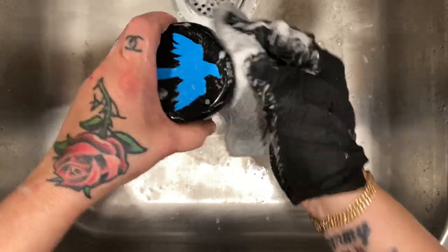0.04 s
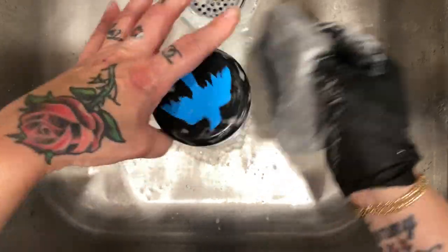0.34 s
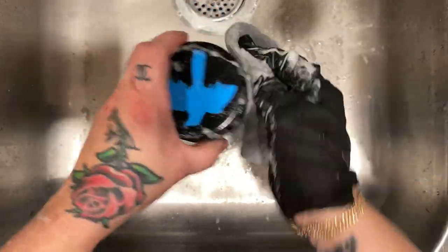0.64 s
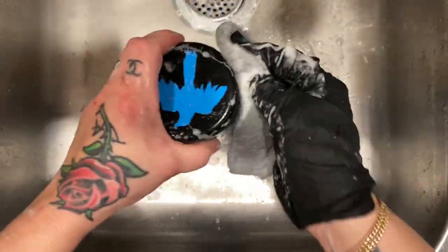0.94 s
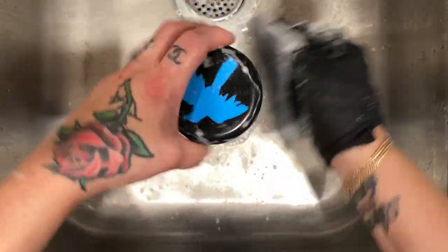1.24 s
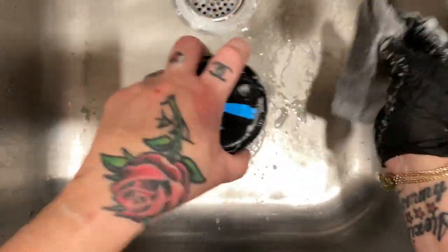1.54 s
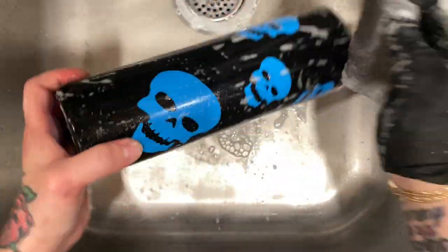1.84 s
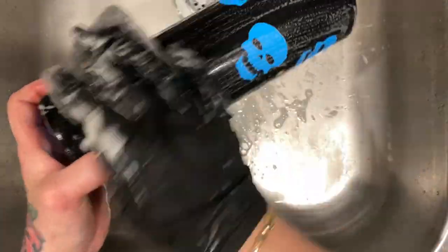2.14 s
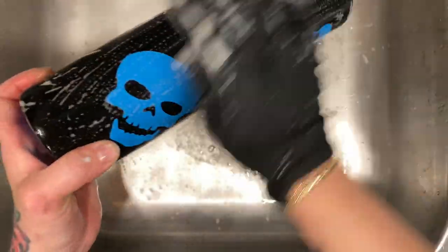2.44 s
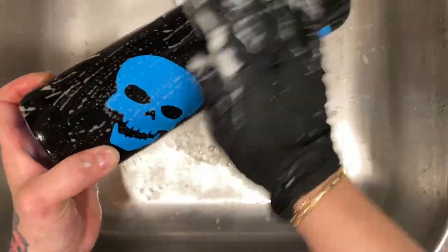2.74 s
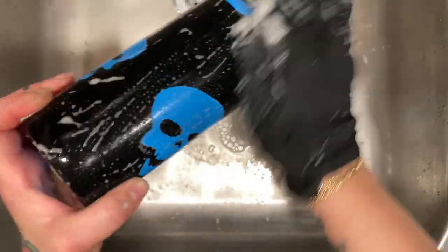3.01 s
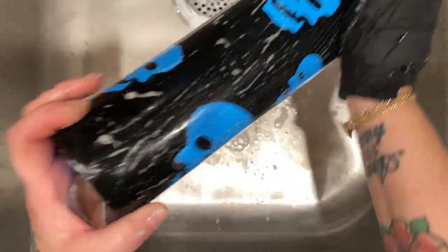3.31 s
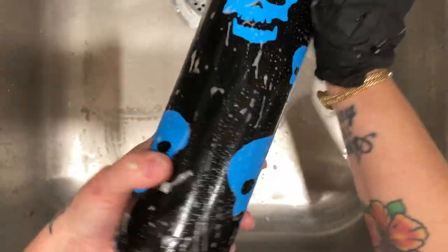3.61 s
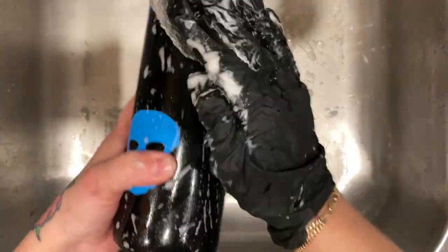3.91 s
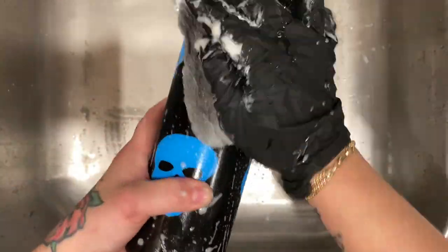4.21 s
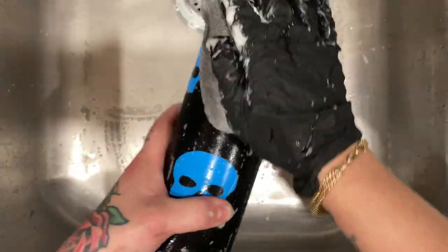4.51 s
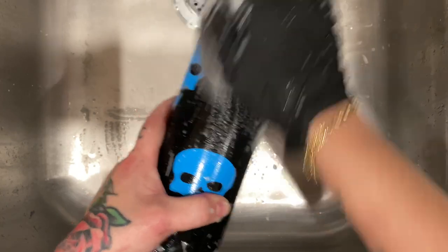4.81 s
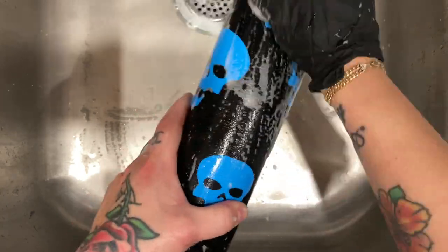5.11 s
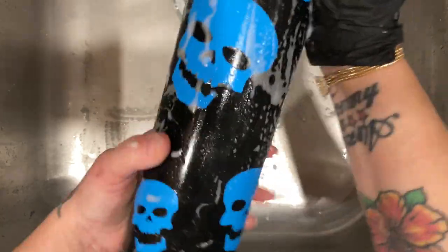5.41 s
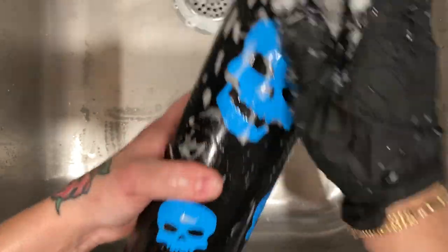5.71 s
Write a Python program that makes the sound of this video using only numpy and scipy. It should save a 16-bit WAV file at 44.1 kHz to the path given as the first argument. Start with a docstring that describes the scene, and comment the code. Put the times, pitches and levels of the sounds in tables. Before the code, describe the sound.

A wet sanding sponge scrubs a steel cup in a metal sink, heard close up. At first, quick shoves knock the cup against the basin, which booms while the cup rings, with wet slaps and tiny squeaks. After a brief lull, the sponge rubs to and fro in soft hissing, rasping strokes, with fizzing lather and a squelch of paste. A low motor hum fills the room throughout.

```python
"""Scrubbing a steel cup in the sink

A wet sanding sponge scrubs a coated steel cup, close up, over the low hum of a motor in the room.
At first the cup stands upside down: each shove knocks it on the steel basin, which booms as the cup rings.
Then it is lifted and its wall is rubbed to and fro in soft hissing strokes: grains rasp, lather fizzes,
paste squelches and the air in the cup rings faintly."""
import sys
import numpy as np
from scipy import signal
from scipy.fft import rfft, irfft, next_fast_len
from scipy.io import wavfile

SR = 44100
rng = np.random.default_rng(int(sys.argv[2]) if len(sys.argv) > 2 else 0)


def unload_audio(sound):
    """Save the sound as a 16-bit wav file, at the path given as the first command line argument."""
    columns = np.transpose(np.atleast_2d(sound))
    # keep every value between -1 and 1, then stretch to whole-number steps
    steps = np.round(np.clip(columns, -1, 1) * 32767)
    wavfile.write(sys.argv[1], SR, steps.astype(np.int16))


N = 253565
T = np.arange(N) / SR
LIFT_S, RESUME_S = 1.6, 1.98  # the cup leaves the basin; the sponge meets it again


def amp(db):
    """Decibels to linear gain."""
    return 10 ** (np.asarray(db) / 20)


def unit(x):
    """Scales x to an rms of 1."""
    return x / np.sqrt(np.mean(x ** 2) + 1e-20)


def add(mix, start_s, sound):
    """Drops a sound into the mix at start_s."""
    part = mix[max(0, round(start_s * SR)):][:len(sound)]
    part += sound[:len(part)]


def eq(x, curve):
    """Shapes x with a curve of (frequency [Hz], gain [dB]) points."""
    size = next_fast_len(x.shape[-1])
    hz, db = np.transpose(curve)
    gain = amp(np.interp(np.log(np.fft.rfftfreq(size, 1 / SR) + 1), np.log(hz), db))
    return irfft(rfft(x, size) * gain, size)[..., :x.shape[-1]]


def wander(hz):
    """Random modulation of rms about 1, with changes up to hz."""
    steps = np.arange(0, T[-1] + 1, 1 / (2 * hz))
    return np.sqrt(3 / 2) * np.interp(T + rng.random() / 2, steps, rng.standard_normal(len(steps)))


def burst(low_hz, high_hz, rise, decay, grain_db=0):
    """A band of grainy noise, like a crowd of close modes that swell and die together."""
    t = T[:round(min(0.5, 10 * decay + 2 * rise) * SR)]
    grains = rng.standard_normal(len(t)) * amp(grain_db * np.minimum(rng.exponential(1, len(t)), 5))
    envelope = (1 - np.exp(-(t / rise) ** 2)) * np.exp(-t / decay)
    band = signal.butter(3, [low_hz, min(high_hz, 0.47 * SR)], "band", fs=SR, output="sos")
    x = signal.sosfilt(band, grains * envelope)
    return x / np.sqrt(np.sum(x ** 2) / (2 * decay * SR))


def grit(per_s, spread_db, judder_db):
    """Tiny clicks of grains or bubbles, uneven in size and bunched into clumps."""
    clicks = (rng.random(N) < per_s / SR) * rng.standard_normal(N)
    return clicks * amp(spread_db * np.minimum(rng.exponential(1, N), 4) + judder_db * wander(60))


# bass-heavy room tone: (frequency [Hz], gain [dB])
ROOM_TONE_EQ = [(15, -35), (30, -30), (45, -0.5), (62, 6), (80, -4), (125, -3), (160, -11), (220, -21.5),
                (400, -18.5), (650, -33.5), (900, -28), (1500, -33.5), (4500, -32.5), (5600, -38),
                (15000, -54)]


def room_hum(rumble_db=-43.5, hum_hz=58.75, hum_db=-45.5):
    """The bed: a motor hums in a rumbling room, centred in the bass and wide higher up."""
    mid, side = eq(rng.standard_normal((2, N)), ROOM_TONE_EQ)
    side = eq(side, [(60, -31), (130, -10.5), (300, -8), (700, 0), (2000, 1)])
    rumble = amp(rumble_db) * unit(np.array([mid + side, mid - side]))
    phase_drift = 0.15 * wander(1)
    hum = amp(hum_db + 0.21 * wander(2)) * np.sin(2 * np.pi * hum_hz * T + phase_drift)
    return rumble + hum


def foam(db=-61, swell_db=1, rest_db=-4):
    """Lather on the glove and in the basin keeps crackling, less while the hand rests."""
    bubbles = grit(per_s=8000, spread_db=1.5, judder_db=5)
    crackle = unit(eq(bubbles, [(1500, -28), (3500, -34), (7000, 6), (15000, 4)]))
    resting = (T > LIFT_S) & (T < RESUME_S)
    return amp(db + swell_db * wander(4) + rest_db * resting) * crackle


# soft bumps as the hand shifts its grip: (time [s], level [dB], rise [s], decay [s])
GRIP_BUMPS = [(1.678, -41.5, 0.016, 0.021), (3.24, -51, 0.019, 0.026), (3.558, -51, 0.0092, 0.021),
              (4.669, -52, 0.016, 0.028), (5.001, -51, 0.071, 0.17)]
# the steel rings on after a knock, then tings faintly in the hand:
# (time [s], level [dB], pitch [Hz], decay [s])
CUP_TINGS = [(1.345, -40, 1218, 0.095), (1.65, -50, 2050, 0.054), (1.84, -63, 1690, 0.27),
             (3.37, -54, 746, 0.077)]
# single foam bubbles bursting: (time [s], level [dB], centre [Hz], decay [s])
FOAM_POPS = [(1.631, -50.5, 12600, 0.0037), (1.806, -55.5, 3560, 0.017), (3.105, -50, 12000, 0.024),
             (5.344, -47, 10540, 0.0031), (5.516, -44.5, 12310, .007)]


def handling(pop_spread=1.29):
    """Small foley of the soapy cup: the grip bumps, the steel tings, bubbles pop."""
    out, t = np.zeros(N), T[:SR]
    for s, db, rise, decay in GRIP_BUMPS:
        add(out, s, amp(db) * burst(low_hz=113, high_hz=267, rise=rise, decay=decay))
    for s, db, hz, decay in CUP_TINGS:
        envelope = (1 - np.exp(-t / 0.012)) * np.exp(-t / decay)
        add(out, s, amp(db) * envelope * np.sin(2 * np.pi * hz * t))
    for s, db, hz, decay in FOAM_POPS:
        add(out, s, amp(db) * burst(hz / pop_spread, hz * pop_spread, rise=0.00047, decay=decay))
    return out


# hollow tone of the lifted cup, lower when the hand shades its mouth:
# (time [s], pitch [Hz], level at the median rub [dB])
AIR_TONE = [(1.6, 340.6, -67), (2.9, 360.7, -61), (3.5, 308.7, -59), (3.57, 311, -62), (3.62, 365.9, -61),
            (4.1, 365.3, -64.5), (4.799, 366, -55.5), (5.2, 345.5, -58), (5.75, 325, -66)]


def air_column(rub, width_hz=46, follow_db_per_db=0.34):
    """Rubbing stirs the air in the cup; it sings out in a soft gulp as the palm comes off the mouth."""
    gulp_s, gulp_db, rise_s, fade_s = 3.58, -39.5, 0.022, 0.086
    times, hz, db = np.transpose(AIR_TONE)
    carrier = np.exp(2j * np.pi * np.cumsum(np.interp(T, times, hz)) / SR)
    flutter = wander(width_hz / 2) + 1j * wander(width_hz / 2)
    level = amp(np.interp(T, times, db)) * (rub / np.median(rub)) ** follow_db_per_db * (T > LIFT_S)
    gulp = amp(gulp_db) * np.exp(-np.maximum((gulp_s - T) / rise_s, (T - gulp_s) / fade_s))
    return (carrier * (level * flutter + gulp)).real


# tiny wet squeaks: (time [s], level [dB], pitch [Hz], decay [s])
RIM_SQUEAKS = [(0.203, -46.5, 4730, 0.006), (0.282, -49, 4760, 0.013), (0.293, -53, 2720, 0.0077),
               (1.288, -47, 3650, 0.0099)]


def squeaking(width_hz=220, rise_s=0.002):
    """The sponge briefly sticks and slips on the rim, which sings at one of its high modes."""
    out = np.zeros(N)
    for s, db, hz, decay in RIM_SQUEAKS:
        add(out, s, amp(db) * burst(hz - width_hz / 2, hz + width_hz / 2, rise_s, decay))
    return out


# wet midrange accents: (time [s], level [dB], centre [Hz], band edge / centre, rise [s], decay [s])
PASTE_SQUELCHES = [(3.535, -50, 965, 1.1, 0.015, 0.025), (3.975, -54.5, 1480, 1.48, 0.011, 0.1),
                   (4.402, -39.5, 1410, 1.16, 0.023, 0.068), (4.398, -43.5, 1073, 1.28, 0.024, 0.15),
                   (4.41, -45.5, 2870, 1.63, 0.058, 0.044), (4.785, -55, 1650, 1.7, 0.015, 0.082),
                   (5.03, -50, 786, 1.83, 0.065, 0.092), (5.24, -56.5, 800, 1.45, 0.018, 0.18)]


def squelching():
    """Pressed paste bubbles through the pores of the sponge."""
    out = np.zeros(N)
    for s, db, hz, spread, rise, decay in PASTE_SQUELCHES:
        add(out, s, amp(db) * burst(hz / spread, hz * spread, rise, decay, grain_db=3))
    return out


# metallic ring of the cup: (pitch [Hz], t60 [s], gain standing [dB], gain held [dB])
CUP_MODES = [(403.3, 0.16, 1.5, -17), (528, 0.31, -1, -25), (817, 0.16, -3.5, -15), (1200, 0.39, -6, -37),
             (1702, 0.26, 2, -13), (1856, 0.036, 0.5, -18), (2716, 0.054, -6.5, -23),
             (3635, 0.034, 5, -5.5), (3736, 0.029, 1, -8), (3950, 0.041, 3, -9), (4420, 0.05, -3, -13),
             (4710, 0.053, 1.5, -16), (5600, 0.055, -7, 0)]


def cup_ring(drive, contact_db=3):
    """Knocks and grit ring the steel, each mode wavering as the contact moves; holding it mutes most."""
    out = np.zeros(N)
    for hz, t60, standing_db, held_db in CUP_MODES:
        radius = np.exp(-np.log(1000) / (t60 * SR))
        feedback = [1, -2 * radius * np.cos(2 * np.pi * hz / SR), radius ** 2]
        gain = amp(np.where(T < LIFT_S, standing_db, held_db) + contact_db * wander(8.87))
        out += signal.lfilter([1 - radius, 0, radius - 1], feedback, gain * drive)
    return out


# low body of a knock, the modes of the basin floor: (pitch [Hz], t60 [s], gain [dB])
FLOOR_MODES = [(73.9, 0.29, 2), (110.3, 0.22, -0.5), (139.5, 0.21, -3), (193.1, 0.2, -2), (241, 0.16, -2),
               (307.3, 0.089, -3.5), (389.3, 0.19, -8.5), (526.4, 0.13, -11.5), (750, 0.13, -20),
               (829, 0.22, -15), (1043, 0.069, -10.5)]


def basin_boom(hard_db, spot_hz, favour_db=6, favour_octaves=0.34, hard_above_hz=270):
    """The sheet steel booms; the struck spot favours some modes, a hard contact wakes the high ones."""
    t, out = T[:SR // 2], 0
    rise_cycles, detune = 0.91, 0.054
    for hz, t60, db in FLOOR_MODES:
        spot_db = favour_db * np.exp(-(np.log2(hz / spot_hz) / favour_octaves) ** 2)
        level_db = db + spot_db + hard_db * (hz > hard_above_hz)
        detuned_hz = hz * (1 + detune * rng.uniform(-0.96, 1))
        tone = np.sin(2 * np.pi * (detuned_hz * t + rng.random()))
        attack = 1 - np.exp(-(t * hz / rise_cycles) ** 2)
        out += amp(level_db - 60 * t / t60) * attack * tone
    return out


# shoves on the standing cup: (time [s], force [dB], hardness [dB], brightness [dB],
# favoured boom [Hz], rub level [dB], rub swell [s])
SHOVES = [(0.02, -37.5, 1, 3.5, 180, -47, 0.015), (0.131, -32.5, -3, -11, 190, -46.5, 0.014),
          (0.228, -33, -1, 2.5, 147, -43, 0.0072), (0.322, -28, 0.5, 2, 232, -33, 0.0012),
          (0.404, -27.5, -2, 4.5, 133, -42.5, 0.011), (0.431, -29.5, -5.5, -6, 97, -65, 0.004),
          (0.499, -29.5, -1.5, 2, 203, -41.5, 0.011), (0.545, -31.5, -3, -6, 131, -68, 0.004),
          (0.668, -29, -2, 6.5, 192, -45.5, 0.0065), (0.767, -33, -12, -4, 128.7, -50.5, 0.024),
          (0.878, -23.5, 3.5, -27, 128, -45, 0.014), (0.995, -31.5, 1.5, 2, 180, -44.5, 0.022),
          (1.087, -38, -3, 8, 150, -51.5, 0.012), (1.167, -37, 3, 7, 200, -43, 0.0028),
          (1.194, -31, 1, -2, 225, -39, 0.003), (1.283, -32, -10, 10, 128, -43.5, 0.005),
          (1.339, -30, 4, 6, 250, -42, 0.0037), (1.371, -33, 0, 2, 244, -70, 0.003),
          (1.457, -26.5, -3.5, 11.5, 207, -44.5, 0.015), (1.538, -31.5, -3, -22, 106, -68, 0.0028)]
# noise layers of a knock, in the order rumble, clack, crunch, splash, slap:
# (low edge [Hz], high edge [Hz], rise [s], decay [s], gain [dB])
KNOCK_LAYERS = [(45.4, 233, 0.0035, 0.059, -5), (283, 1080, 0.00033, 0.012, -13.5),
                (1145, 2190, 0.00049, 0.0032, -19.5), (2200, 24000, 0.00041, 0.008, -17),
                (700, 12800, 0.00036, 0.0019, -10.5)]
# how each of those layers tracks the hit: (share of hardness [dB/dB], share of brightness [dB/dB])
LAYER_TRACKING = [(0, 0.0017), (1, 0), (1, 1.37), (1, 0.62), (1, 0.15)]


def knocking():
    """The rim hits the basin: a wet slap and gritty crunch up front, booming steel in the tail."""
    out = np.zeros(N)
    for s, force_db, hard_db, bright_db, spot_hz, *_ in SHOVES:
        add(out, s, amp(force_db) * basin_boom(hard_db, spot_hz))
        for layer, (hard_share, bright_share) in zip(KNOCK_LAYERS, LAYER_TRACKING):
            low_hz, high_hz, rise, decay, gain_db = layer
            db = force_db + gain_db + hard_share * hard_db + bright_share * bright_db
            add(out, s, amp(db) * burst(low_hz, high_hz, rise, decay, grain_db=0.5))
    return out


def spitting(snap_db=-37.5, per_s=420, fade_s=0.022):
    """Each shove squeezes the wet sponge flat: a quick run of bubble snaps that scales with its rub."""
    out, t = np.zeros(N), T[:SR // 8]
    loudest_db = max(rub_db for *_, rub_db, _ in SHOVES)
    for s, *_, rub_db, _ in SHOVES:
        snaps = (rng.random(len(t)) < per_s / SR) * rng.uniform(-0.65, 1, len(t))
        envelope = amp(snap_db + rub_db - loudest_db) * np.exp(-t / fade_s)
        add(out, s, envelope * snaps * np.sqrt(SR / per_s))
    return eq(out, [(500, -9), (1500, 4), (4500, 9.5), (8000, 4), (15000, -4)])


# light drags on the standing cup, then to and fro on its wall: (start [s], length [s], level [dB])
SPONGE_STROKES = [(0.09, 0.15, -48.5), (0.259, 0.084, -46), (0.57, 0.14, -50), (0.723, 0.11, -52.5),
                  (1.036, 0.125, -50.5), (1.23, 0.057, -47), (1.492, 0.091, -52), (1.787, 0.23, -62.5),
                  (1.967, 0.25, -46.3), (2.145, 0.222, -47.5), (2.346, 0.16, -50), (2.485, 0.17, -51),
                  (2.638, 0.15, -49.5), (2.768, 0.17, -52.5), (2.933, 0.14, -50.5), (3.06, 0.094, -51),
                  (3.102, 0.24, -47.5), (3.2, 0.27, -52.5), (3.45, 0.2, -50), (3.624, 0.25, -48),
                  (3.745, 0.21, -46.5), (3.922, 0.19, -47), (4.095, 0.15, -48), (4.237, 0.16, -46),
                  (4.353, 0.19, -41.5), (4.529, 0.12, -46), (4.636, 0.13, -45), (4.746, 0.13, -45),
                  (4.862, 0.12, -45), (4.971, 0.19, -45), (5.09, 0.21, -49), (5.268, 0.25, -53.5),
                  (5.418, 0.28, -45.5), (5.681, 0.12, -54)]


def rub_envelope(arch, drag_db=-56, run_out_s=0.036):
    """The sponge's gesture: a light drag with a swell at each shove, plus arched, overlapping strokes."""
    power = amp(drag_db) ** 2 * (T < LIFT_S)
    for s, *_, rub_db, swell_s in SHOVES:
        width = np.where(T < s, swell_s, run_out_s)
        power += (amp(rub_db) * np.exp(-((T - s) / width) ** 2 / 2)) ** 2
    for start, length, db in SPONGE_STROKES:
        progress = (T - start) / length
        moving = (progress > 0) & (progress < 1)
        power[moving] += (amp(db) * np.sin(np.pi * progress[moving]) ** arch) ** 2
    return np.sqrt(power)


# sandy rasp, with an added lift in the very top treble: (frequency [Hz], gain [dB])
RASP_EQ = [(300, -19), (650, -2.5), (1000, 4), (1900, 3.5), (2900, -0.5), (3800, -0.5), (5000, 0.5),
           (5500, -7.5), (7000, -1.5), (9500, -13.5), (12500, -11), (15700, -2)]
# bright, airy fizz: (frequency [Hz], gain [dB])
FIZZ_EQ = [(2000, -26), (5000, -7), (7000, 2.5), (11000, 2), (15700, 6)]
# lather, thick on the fresh wall and then rubbed thin: (time [s], fizz over rasp [dB])
LATHER_CURVE = [(0, 5.5), (0.4, 0), (0.85, 6), (1.2, 3), (1.55, -4), (1.85, -2), (2.1, 9), (2.25, 6.5),
                (3.11, 10), (3.22, -1), (3.55, 0), (3.75, 1.5), (3.86, 2), (4.3, 2), (4.45, -2),
                (4.52, -20), (4.59, 0.5), (4.7, -0.5), (4.82, 3), (5.05, -1), (5.22, 1.5), (5.75, -1.5)]


def scrubbing(rub, sweep, crackle_db=-5, slurp_db=-12):
    """Grains rasp under the rub, lather fizzes in the fast sweep, and paste slurps where it runs thin."""
    lather = amp(np.interp(T, *np.transpose(LATHER_CURVE)))
    grains = grit(per_s=14000, spread_db=1.5, judder_db=1.5)
    rasp = unit(eq(grains, RASP_EQ))
    wetness = lather * amp(1.8 * wander(8.2))
    bubbles = grit(per_s=24000, spread_db=1.2, judder_db=1.3)
    fizz = wetness * unit(eq(bubbles, FIZZ_EQ))
    # on the edge of the standing cup's base the sponge catches and lets go in coarse clumps
    clumps = grit(per_s=2500, spread_db=3, judder_db=3.2)
    clumps = eq(clumps, [(900, 25), (2500, 3), (4500, -42), (7000, -25), (15000, -34)])
    crackle = amp(crackle_db) * unit(clumps)
    paste = grit(per_s=3000, spread_db=3, judder_db=3)
    paste = eq(paste, [(500, -2), (950, -36), (2100, 20), (3200, -24)])
    slurp = amp(slurp_db) * unit(paste) / (1 + lather ** 2)
    return sweep * fizz + rub * (rasp + np.where(T < LIFT_S, crackle, slurp))


def basin_reflections(x, t60=0.063, direct_db=-1.5, pose_count=5, echoes_per_s=3000):
    """Sound arrives on the right first; steel walls scatter it by paths that shift as the hands move."""
    t, lag = T[:SR // 5], round(SR / 5700)
    direct = amp(direct_db) * eq(x, [(200, 1), (700, -0.5), (4500, -14), (7000, 0.5)])
    delayed = np.r_[np.zeros(lag), direct[:-lag]]
    out = np.array([delayed, direct])
    wall_eq = [(80, -10), (200, -17), (400, 2), (700, 0), (4500, 3.5), (7000, -2), (15000, -17)]
    # one short stereo tail per hand pose, crossfaded at constant power
    poses = np.array([wander(3) for _ in range(pose_count)])
    for share in poses / np.linalg.norm(poses, axis=0):
        signs = rng.choice([-1., 1.], (2, len(t)))
        arrivals = (rng.random((2, len(t))) < echoes_per_s / SR) * (t > 0.001)
        tail = signs * arrivals * amp(-60 * t / t60)
        tail /= np.linalg.norm(tail, axis=1, keepdims=True)
        out += signal.oaconvolve((x * share)[None], eq(tail, wall_eq), axes=1)[:, :N]
    return out


def scene():
    """Sponge and knocks set the cup ringing; it all plays inside the basin, over the hum of the room."""
    rub, sweep = rub_envelope(arch=0.7), rub_envelope(arch=1)
    contact = scrubbing(rub, sweep) + knocking() + spitting()
    ring = cup_ring(contact)
    details = squeaking() + squelching() + air_column(rub) + handling() + foam()
    return basin_reflections(contact + ring + details) + room_hum()


def record(dry, cutoff_hz=15820):
    """Master EQ: the image leans right below the top treble, and a steep low-pass trims the air."""
    left = eq(dry[0], [(100, -1.46), (2500, -1.34), (5000, -1.4), (8000, 0.26)])
    right = eq(dry[1], [(100, 0.65), (2500, 1.56), (5000, 2.5), (8000, 0.11)])
    lowpass = signal.firwin(1023, cutoff_hz, window=("kaiser", 9), fs=SR)
    return signal.oaconvolve(np.array([left, right]), lowpass[None], "same")


dry = scene()
out = record(dry)
unload_audio(out)
```